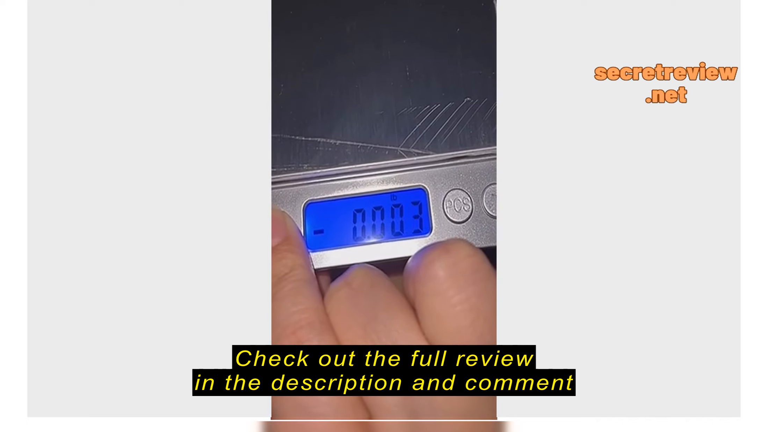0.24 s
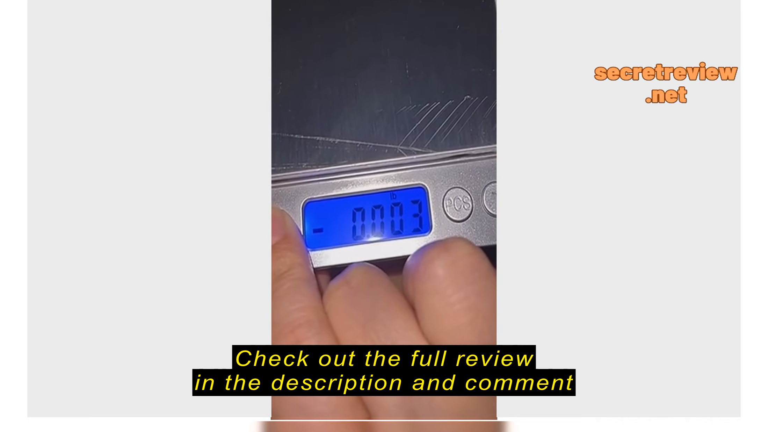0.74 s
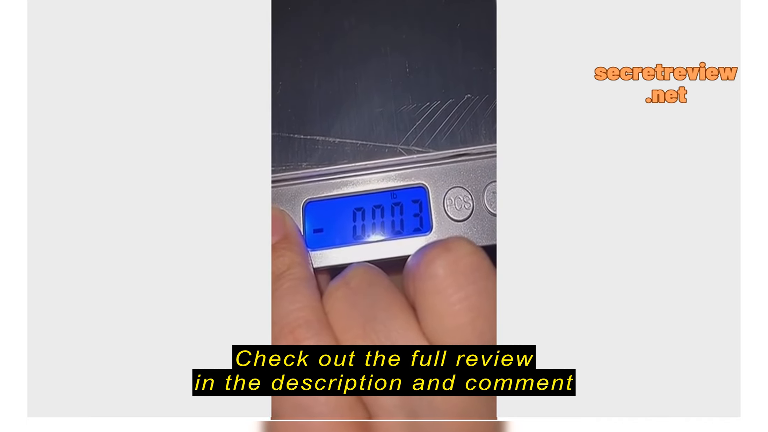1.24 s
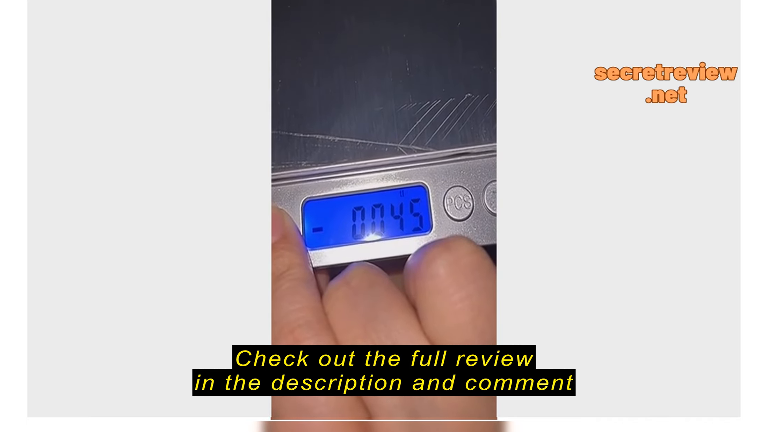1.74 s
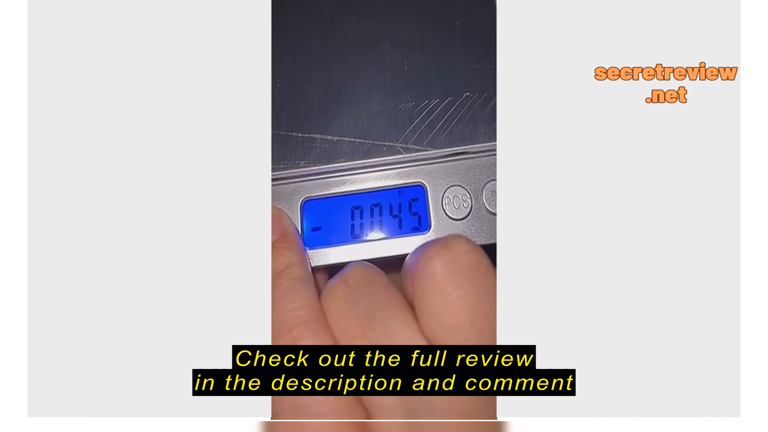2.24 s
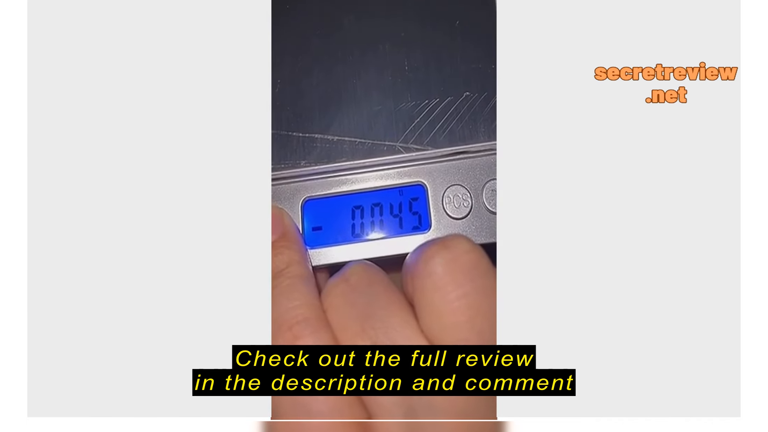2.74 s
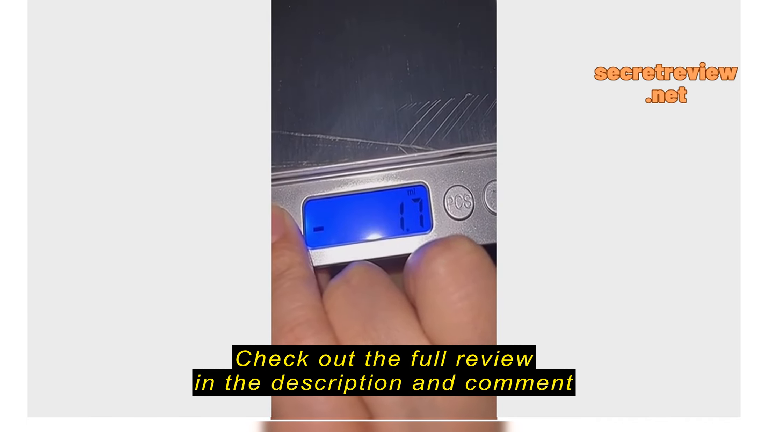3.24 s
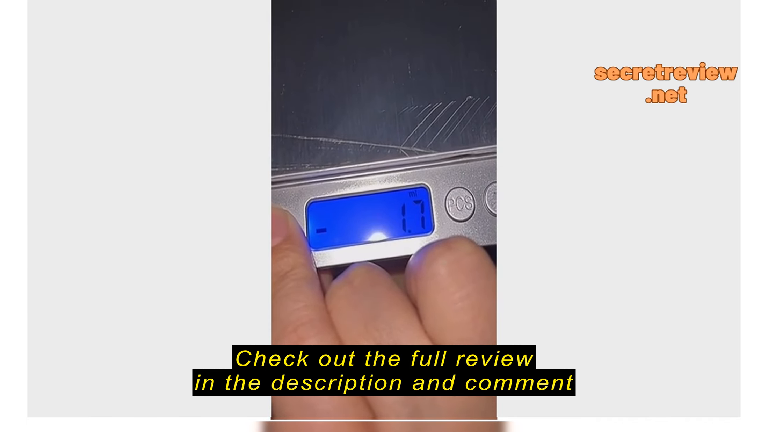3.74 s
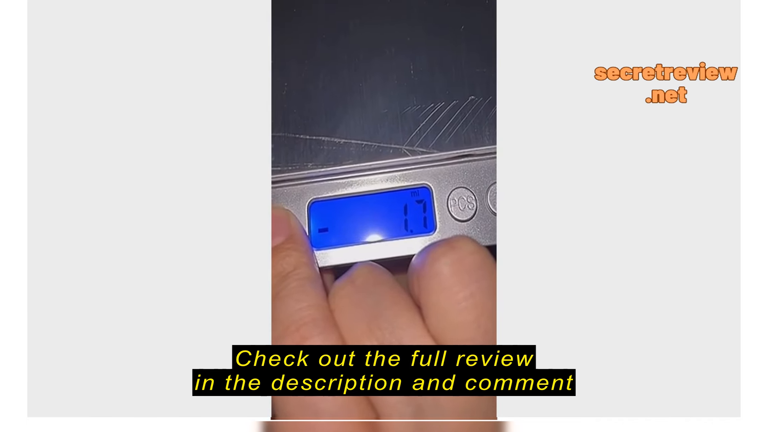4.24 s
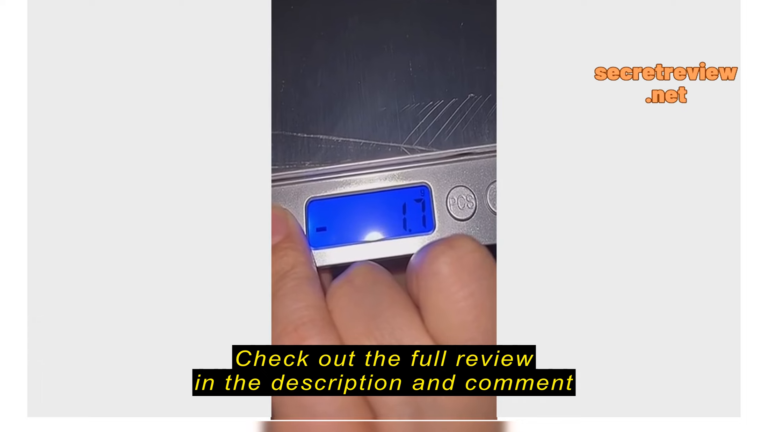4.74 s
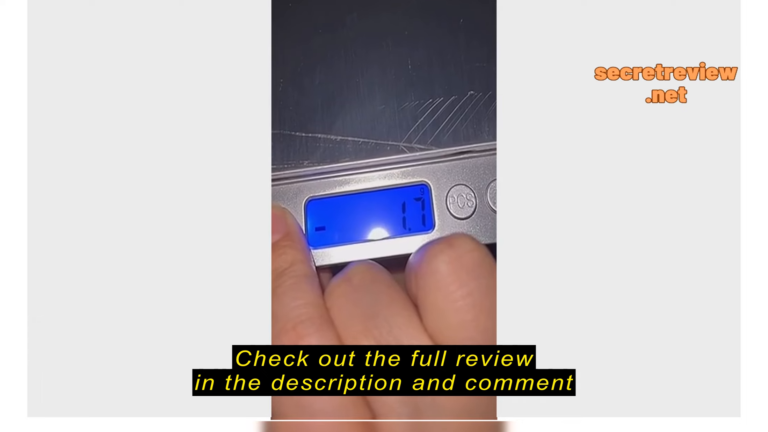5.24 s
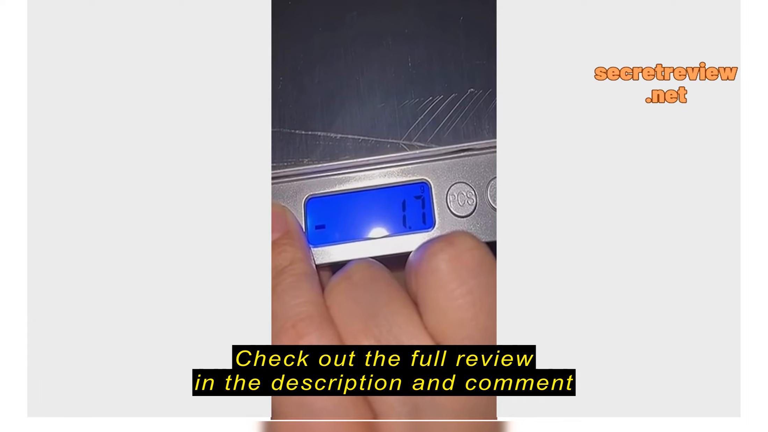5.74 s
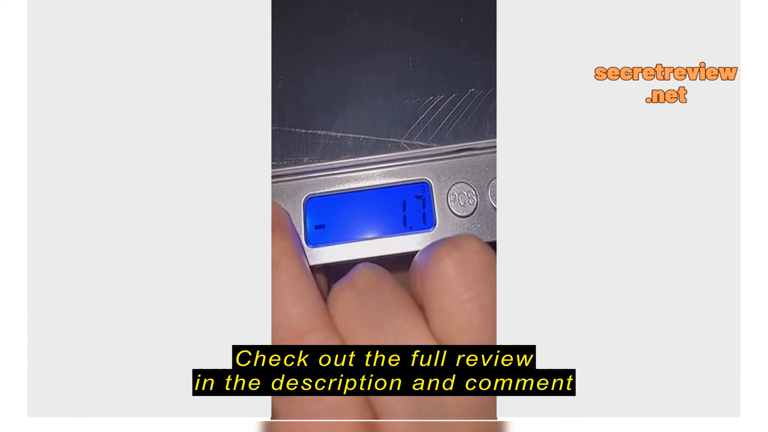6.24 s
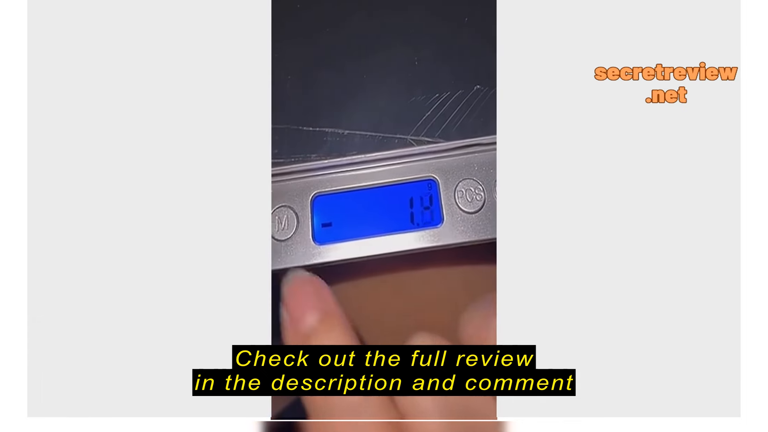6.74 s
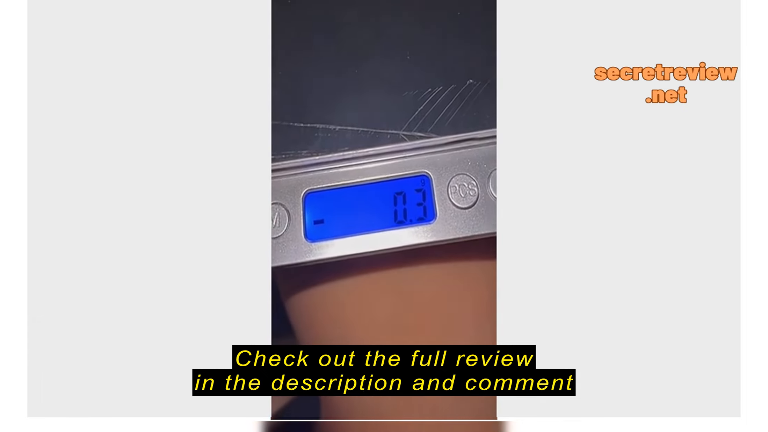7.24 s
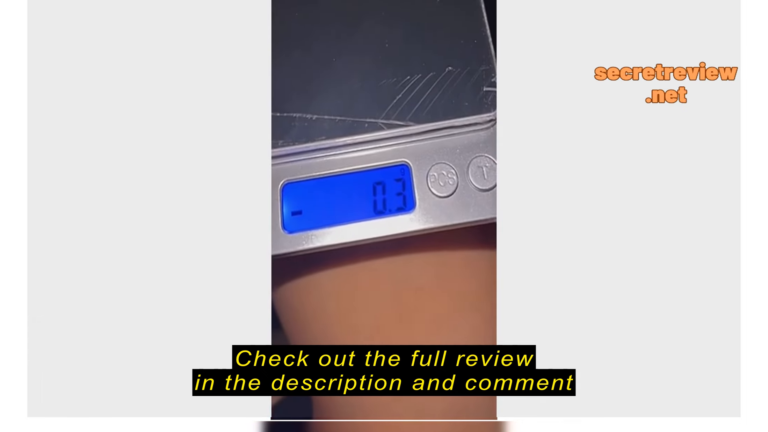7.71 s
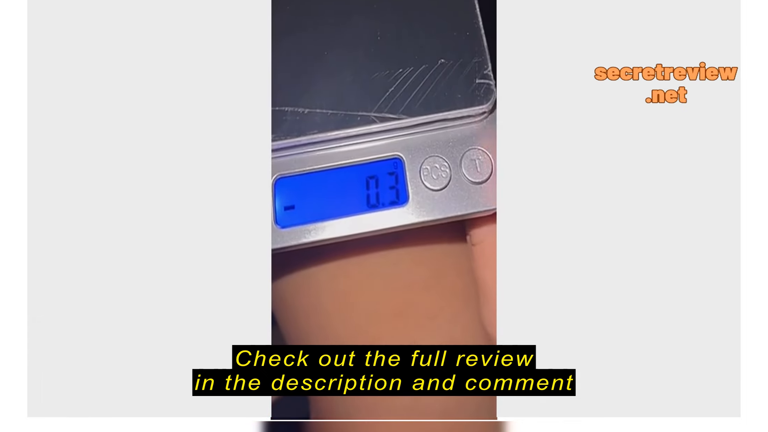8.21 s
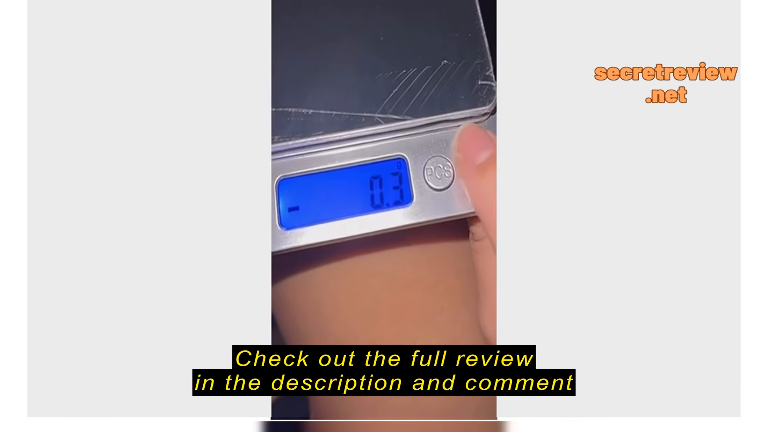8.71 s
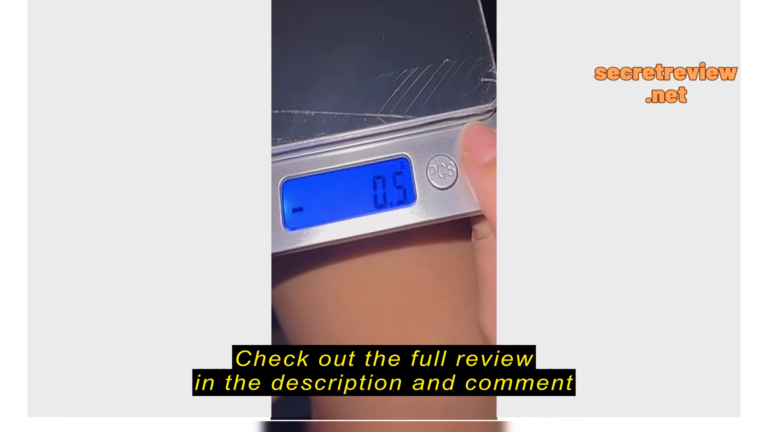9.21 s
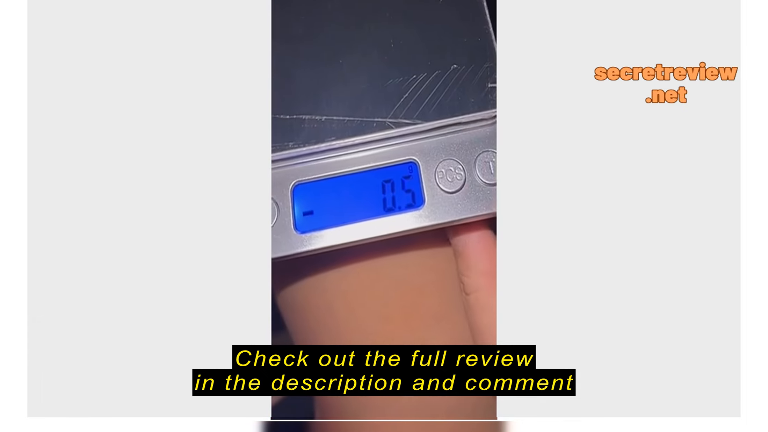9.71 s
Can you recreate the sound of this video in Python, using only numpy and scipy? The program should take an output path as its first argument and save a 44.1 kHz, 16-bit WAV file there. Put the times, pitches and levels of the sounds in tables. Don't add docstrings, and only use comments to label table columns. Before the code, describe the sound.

A small kitchen scale's dome button is pressed slowly, close to a stereo phone microphone. After a quiet opening second, each bright, crisp press snap is followed a third of a second later by a more hollow plastic release click. Five pairs come about 1.7 seconds apart, then one last press. Faint short room echo and steady low house hum lie beneath, with barely audible far whistles.

```python
import sys
import numpy as np
from scipy import signal
from scipy.fft import rfft, irfft, next_fast_len
from scipy.io import wavfile
from scipy.ndimage import uniform_filter1d

SR = 44100
rng = np.random.default_rng(int(sys.argv[2]) if len(sys.argv) > 2 else 0)


def voltage_ratio(decibels):
    exponent = np.asarray(decibels, float) / 20
    return 10 ** exponent


def wrap_up_sound(samples):
    columns = np.atleast_2d(samples).T
    tamed = np.clip(columns, -1, 1)
    steps = np.round(tamed * 32767).astype(np.int16)
    wavfile.write(sys.argv[1], SR, steps)


N = 439662
LONG = next_fast_len(N + SR)
HZ = np.arange(LONG // 2 + 1) * SR / LONG + 1e-9


def along(table, column=1, hz=HZ):
    rows = np.array(table, float)
    return np.interp(np.log(hz), np.log(rows[:, 0]), rows[:, column])


def shape(x, gain):
    return irfft(rfft(x, LONG) * gain, LONG)[..., :N]


def bell(centre_hz, width_hz):
    return 1 / (1 + (2 * (HZ - centre_hz) / width_hz) ** 2)


def wander(step):
    aims = rng.standard_normal(N // step + 1)
    return uniform_filter1d(np.repeat(aims, step)[:N], size=step)


# freq_hz, density_db (per Hz)
HOUSE_SPECTRUM = [(40, -1.5), (66, -2), (200, -12.5), (560, -21), (1650, -34), (2910, -39.5), (9570, -49.5),
                  (14400, -65.5)]
# freq_hz, width_hz, level_db
HOUSE_HUMPS = [(70, 30, 3), (245, 40, 3), (2300, 300, 3), (4350, 400, 3), (5000, 500, -3), (5800, 600, 5),
               (9750, 30, 10), (14200, 1500, 5)]


def house():
    db = along(HOUSE_SPECTRUM) + sum(gain_db * bell(hz, width) for hz, width, gain_db in HOUSE_HUMPS)
    hum = shape(rng.standard_normal((2, N)), voltage_ratio(db) / (1 + (HZ / 15200) ** 24))
    bass_swell = voltage_ratio(1.2 * wander(8192)) - 1
    hum = hum + bass_swell * shape(hum, 1 / (1 + (HZ / 90) ** 4))
    low_middle_swell = voltage_ratio(0.61 * wander(16384)) - 1
    hum = hum + low_middle_swell * shape(hum, 1 / (1 + ((HZ - 430) / 170) ** 4))
    return hum * voltage_ratio(-46.5) / hum.std()


# start_s, length_s, pitch_hz, level_db
FAR_WHISTLES = [
    (.03, .38, 2500, -72),
    (5.26, .28, 1950, -72),
    (6.11, .44, 2010, -69),
]


def whistles():
    out, t = np.zeros(N), np.arange(N) / SR
    for start_s, length_s, hz, db in FAR_WHISTLES:
        air = shape(rng.standard_normal(N), bell(hz, 100))
        progress = np.clip((t - start_s) / length_s, 0, 1)
        fade = np.sqrt(np.clip(np.sin(np.pi * progress), 0, 1))
        out += voltage_ratio(db) * air / air.std() * fade
    return out


# freq_hz, t60_s, wall_level_db, table_level_db (short early echo)
ROOM_ECHO = [(590, 0.57, -36.5, -37), (1157, 0.29, -24, -32), (2420, 0.36, -28, -35), (4804, .45, -35, -45),
             (8500, 0.46, -30.5, -44), (14500, .3, -32, -51.5)]


def walls(x):
    t = np.arange(SR // 2) / SR
    tail = 0
    for hz, t60, wall_db, table_db in ROOM_ECHO:
        edges = [hz / 2 ** .5, min(hz * 2 ** .5, 15200)]
        band = signal.butter(2, edges, "bandpass", fs=SR, output="sos")
        fade = voltage_ratio(wall_db - 60 * t / t60) + voltage_ratio(table_db - 60 * t / 0.12)
        onset = np.clip(t / .005, 0, 1)
        tail = tail + signal.sosfilt(band, rng.standard_normal((2, len(t)))) * fade * onset
    return signal.fftconvolve(x[None], 0.21 * tail, axes=1)[:, :N]


# freq_hz, width_hz, level_db
TABLE_TOP = [(764, 80, 3.5), (1170, 87, 3), (3460, 120, 5.5), (3692, 120, -4), (1040, 60, -4),
             (4400, 300, 4.5)]


def table_top(spread):
    spread = shape(spread, 1 / (1 + (HZ / 11500) ** 6) + voltage_ratio(-27.0))
    return shape(spread, voltage_ratio(sum(db * bell(hz, width) for hz, width, db in TABLE_TOP)))


# start_s, level_db, left_minus_right_db
CAP_TICKS = [
    (1.5685, -4, 14),
]


def ticks():
    out = np.zeros((2, N))
    for start_s, db, pan_db in CAP_TICKS:
        out[:, int(start_s * SR)] = voltage_ratio(db + np.array([pan_db, -pan_db]) / 2)
    return shape(out, 1 / (1 + (6500 / HZ) ** 4) / (1 + (HZ / 12500) ** 4))


def started(case, dome, starts):
    rows = []
    for modes, (cycles, ms) in zip((case, dome), starts):
        for row in modes:
            rows.append(tuple(row) + (1000 * cycles / row[0] + ms,))
    return rows


def ring(modes, t, dome_db, top_db):
    hz, t60_ms, db, swell_ms, sign, late_ms = np.array(modes, float).T[:, :, None]
    luck = rng.standard_normal((len(modes), 2)).T[:, :, None]
    loose = np.clip((hz - 4000) / 3000, 0, 1)
    part_db = np.where(hz < 2700, 0, np.where(hz < 6400, dome_db, top_db))
    db = db + part_db + 2 * loose * luck[0]
    ms = np.maximum(1000 * t - late_ms, 0)
    swell = 1 - np.exp(-ms / np.maximum(swell_ms, .05))
    pitch_hz = hz * (1 + 0.003 * loose * luck[1])
    sines = np.sin(2 * np.pi * pitch_hz * ms / 1000)
    return np.sum(sign * voltage_ratio(db - 60 * ms / t60_ms) * swell * sines, axis=0)


# freq_hz, density_db (per Hz)
CRACK_SPECTRUM = [(3530, -36), (6000, -4), (8160, -8.5), (8900, -2.5), (10800, -6.5), (12900, -36),
                  (14600, -31), (16000, -47.5)]


def stroke(events, modes, case_db, dome_db, top_db, crack_db, peak_ms, rise_ms, fall_ms, corner_hz, pitch):
    length, lead = 4096, 512
    tone, crack, pulse = np.zeros(N + length), np.zeros((2, N + length)), np.zeros(N)
    for start_s, db, dome_rel_db, crack_rel_db, pan_db in events:
        start = int(start_s * SR) - lead
        here = slice(start, start + length)
        t = (start + np.arange(length)) / SR - start_s - .8 / 1000
        tone[here] += voltage_ratio(db + case_db) * ring(modes, t, dome_db + dome_rel_db, top_db + crack_rel_db)
        from_peak_ms = 1000 * t - peak_ms
        burst = np.exp(np.where(from_peak_ms < 0, from_peak_ms / rise_ms, -from_peak_ms / fall_ms))
        noise = rng.standard_normal((3, length))
        sides = voltage_ratio(np.array([[pan_db], [-pan_db]]) / 2) * (noise[0] + .5 * noise[1:])
        crack[:, here] += voltage_ratio(db + crack_db + crack_rel_db) * burst * sides
        pulse[start + lead] = voltage_ratio(db)
    no_bass = signal.butter(2, 330, "high", fs=SR, output="sos")
    crack = shape(crack[:, :N], voltage_ratio(along(CRACK_SPECTRUM, hz=HZ / pitch)))
    near = signal.sosfilt(no_bass, tone[:N]) + crack
    return near, shape(pulse, 1 / (1 + 1j * HZ / corner_hz))


# start_s, peak_db, dome_db, crack_db, left_minus_right_db (crack)
RELEASES = [
    (1.5642, -10.5, -13, -7, 0),
    (3.285, -11.5, -11.5, -9, 0),
    (5.0825, -11, -16, -12.5, 0.00084),
    (6.7955, -11, -15.5, -11, 0),
    (8.5621, -11.5, -14, -10, 0.00093),
]
# freq_hz, t60_ms, level_db, swell_ms, first_move (+1 out, -1 in)
RELEASED_CASE = [(514, 11.1, -40.6, 0.05, 1), (681, 46.3, -30.7, 2.66, -1), (760, 28.0, -19.7, 0.68, -1),
                 (1049, 22.8, -3.0, 8.17, 1), (1147, 27.0, -11.6, 1.4, 1), (1261, 45.0, -25.0, 8.17, 1),
                 (1488, 8.9, -10.9, 0.23, 1), (1611, 26.7, -25.3, 0.05, 1), (1939, 13.3, -1.8, 8.17, 1),
                 (2061, 21.9, -16.4, 8.17, -1), (2505, 21.8, -25.5, 0.32, -1)]
RELEASED_DOME = [(2886, 17.1, -19.2, 8.17, -1), (3141, 7.1, -14.4, 4.12, -1), (3536, 13.9, -14.4, 1.21, 1),
                 (3879, 16.4, -19.6, 8.17, -1), (4434, 7.7, -5.1, 8.17, 1), (4690, 15.4, -17.6, 8.17, -1),
                 (5526, 11.4, -10.9, 8.17, -1), (5762, 8.3, -1.1, 8.17, -1), (6260, 8.1, -10.8, 4.45, -1),
                 (6697, 6.4, -20.3, 0.09, -1), (7259, 11.7, -6.6, 3.3, -1), (7882, 7.0, -7.3, 4.77, -1)]
# delay_cycles, offset_ms
RELEASED_STARTS = [(2.931, -1.608), (.848, -.665)]


def releases():
    modes = started(RELEASED_CASE, RELEASED_DOME, RELEASED_STARTS)
    return stroke(RELEASES, modes, case_db=11.5, dome_db=13.0, top_db=8.5, crack_db=4.5,
                  peak_ms=0.99, rise_ms=1.2, fall_ms=1.6, corner_hz=6020, pitch=1.05)


# start_s, peak_db, dome_db, crack_db, left_minus_right_db (crack)
PRESSES = [
    (1.3062, -9.5, -5, -18, 5),
    (2.9838, -9.5, -5, -16.5, 3),
    (4.7343, -10, -4.5, -13, -4.5),
    (6.472, -9, -6.5, -19.5, -5),
    (8.2422, -9.5, -4, -13, -1),
    (9.9361, -9, -6, -15.5, 2),
]
# freq_hz, t60_ms, level_db, swell_ms, first_move (+1 out, -1 in)
PRESSED_CASE = [(504, 32.5, -38.8, 8.05, 1), (632, 5.7, -21.8, 4.86, -1), (789, 47.1, -32.7, 1.43, -1),
                (1056, 19.9, -10.3, 8.17, -1), (1124, 44.6, -27.7, 0.2, 1), (1262, 26.2, -19.4, 8.16, 1),
                (1518, 38.0, -22.7, 0.12, 1), (1671, 9.4, -8.7, 0.88, 1), (1960, 21.8, -16.5, 0.07, -1),
                (2138, 46.1, -30.6, 5.05, -1), (2543, 18.2, -22.2, 0.47, -1)]
PRESSED_DOME = [(3164, 5.2, 3.5, 0.24, 1), (3171, 6.6, 0.5, 0.13, -1), (3536, 14.5, -12.4, 0.05, 1),
                (3908, 7.7, -4.7, 6.4, -1), (4585, 6.9, 2.5, 5.36, 1), (5013, 8.6, -21.3, 0.11, -1),
                (5750, 3.0, -3.3, 0.1, -1), (5772, 31.0, -30.5, 0.23, 1), (6031, 6.6, -0.7, 4.86, 1),
                (6640, 6.2, -11.9, 0.13, -1), (7157, 12.1, -17.0, 0.55, -1), (7574, 12.8, -21.7, 0.05, -1)]
# delay_cycles, offset_ms
PRESSED_STARTS = [(1.757, -.781), (1.126, -.955)]


def presses():
    modes = started(PRESSED_CASE, PRESSED_DOME, PRESSED_STARTS)
    return stroke(PRESSES, modes, case_db=9.5, dome_db=5.0, top_db=15, crack_db=10.0,
                  peak_ms=0.65, rise_ms=1.1, fall_ms=1.9, corner_hz=9070, pitch=.98)


# freq_hz, diffuse_left_lag_rad, near_left_lag_rad, diffuse_likeness (0-1)
MIC_PORTS = [(100, 0, 0, 1), (350, 0, 0.15, .9), (600, 0.5, 0, 0), (1350, 0.036, -.68, .2),
             (1800, 0.026, -.05, .95), (2860, 0.25, -1.1, .5), (4120, 0.085, 0, 0.7),
             (6500, 0.93, 1.3, 0.2)]


def ports(near, one, other):
    like = np.clip(along(MIC_PORTS, column=3), 0, 1)
    far_turn = np.exp(.5j * along(MIC_PORTS))
    near_turn = 1 + 1j * np.tan(.5 * along(MIC_PORTS, column=2))
    both = rfft(one, LONG) * np.sqrt((1 + like) / 2)
    apart = rfft(other, LONG) * np.sqrt((1 - like) / 2)
    left = irfft(rfft(near[0], LONG) * near_turn.conj() + (both + apart) / far_turn, LONG)
    right = irfft(rfft(near[1], LONG) * near_turn + (both - apart) * far_turn, LONG)
    return np.array([left, right])[:, :N]


def scene():
    press, press_pulse = presses()
    release, release_pulse = releases()
    near = press + release + ticks()
    spread = voltage_ratio(-10.5) * press[0] + voltage_ratio(-9.5) * release[0]
    spread = spread + voltage_ratio(14) * press_pulse + voltage_ratio(12.5) * release_pulse
    diffuse = walls(table_top(spread)) + house()
    return ports(near, diffuse[0] + whistles(), diffuse[1])


def roll_off(x):
    return signal.sosfilt(signal.butter(12, 16680, fs=SR, output="sos"), x)


def record(dry):
    x = shape(dry, 1 / (1 + (47 / HZ) ** 6))
    x = shape(x, 1 / (1 + (HZ / 16500) ** 80))
    high = shape(x, 1 / (1 + ((HZ - 12600) / 1400) ** 12) + 1 / (1 + (15400 / HZ) ** 60))
    middle = shape(x[0], 1. * (HZ > 3000) * (HZ < 10000))
    body_db = 10 * np.log10(uniform_filter1d(middle ** 2, size=384) + 1e-12)
    masked = uniform_filter1d(1. * (body_db > -68) * (body_db < -37), size=256)
    return roll_off(x - masked ** 2 * high)


dry = scene()
out = record(dry)
wrap_up_sound(out)
```